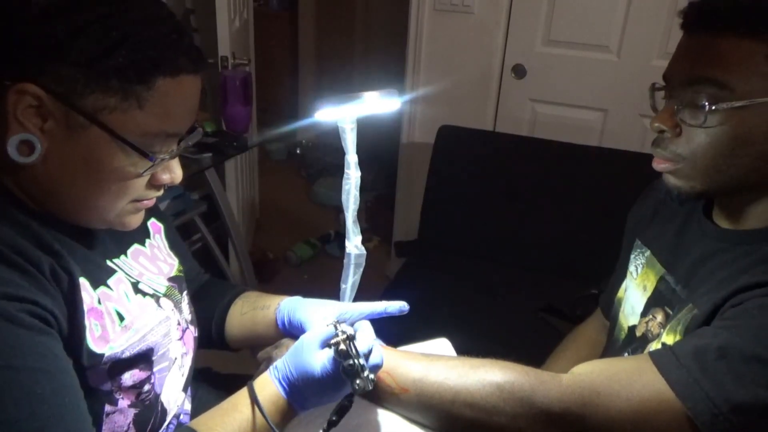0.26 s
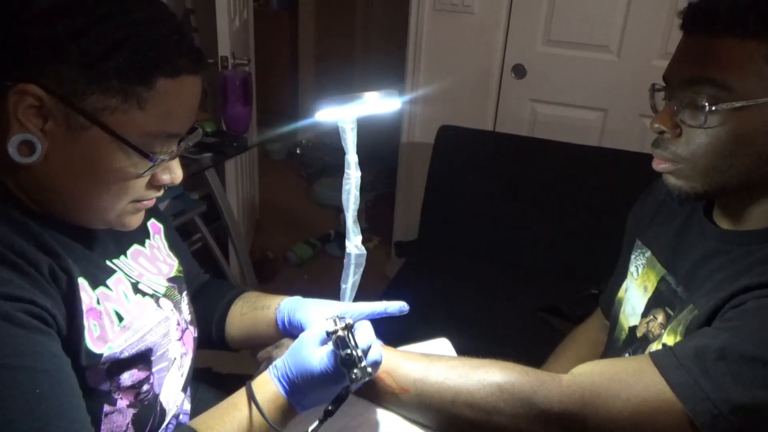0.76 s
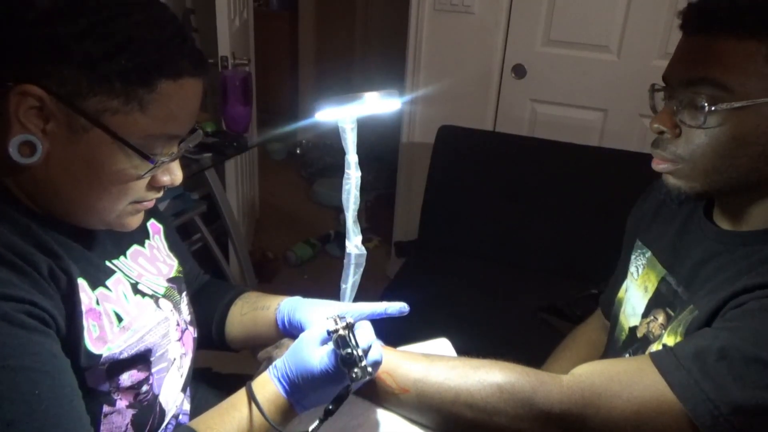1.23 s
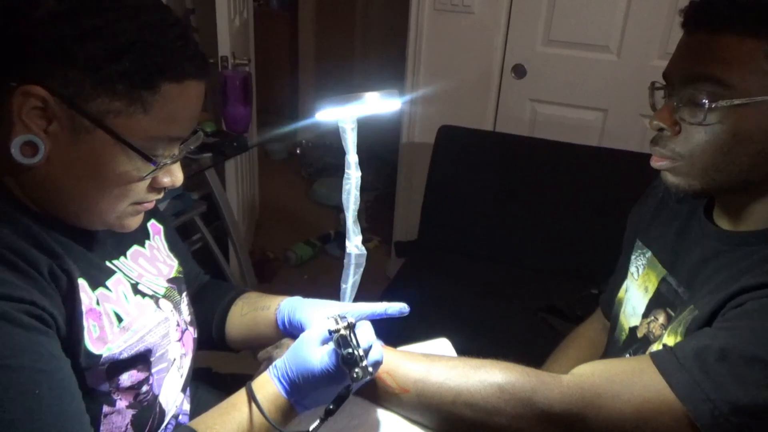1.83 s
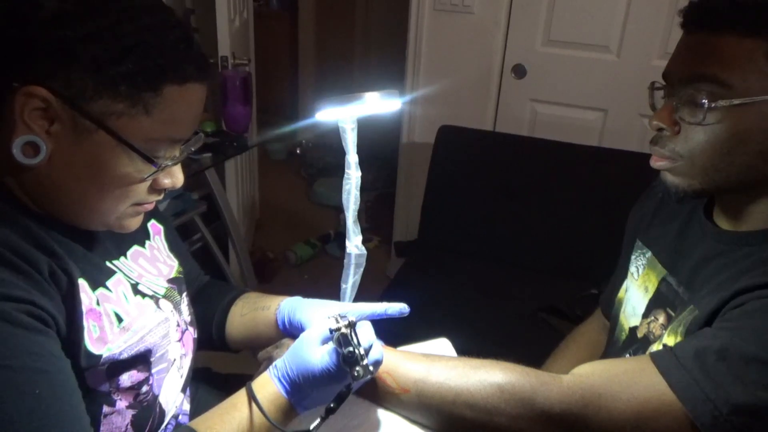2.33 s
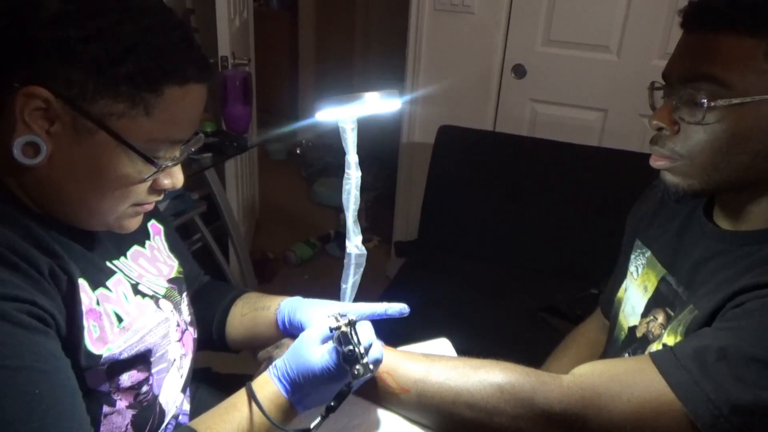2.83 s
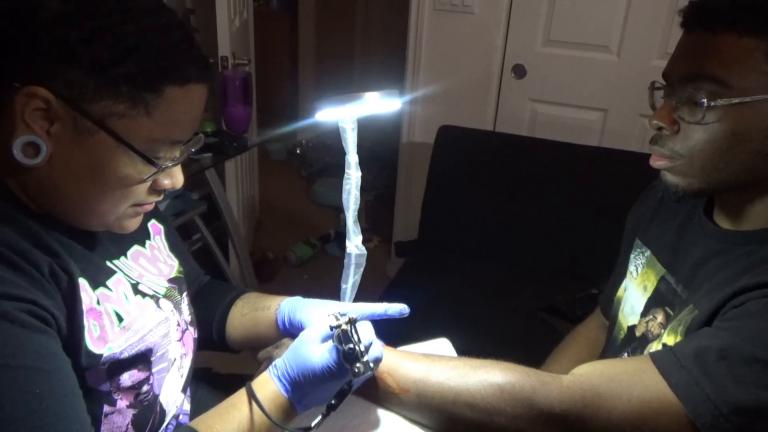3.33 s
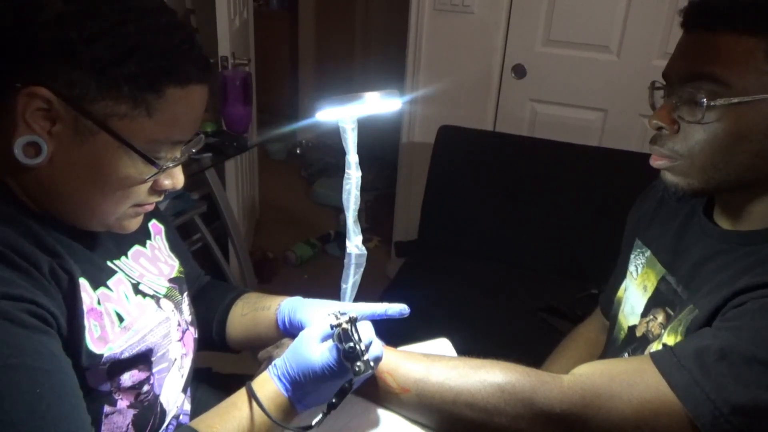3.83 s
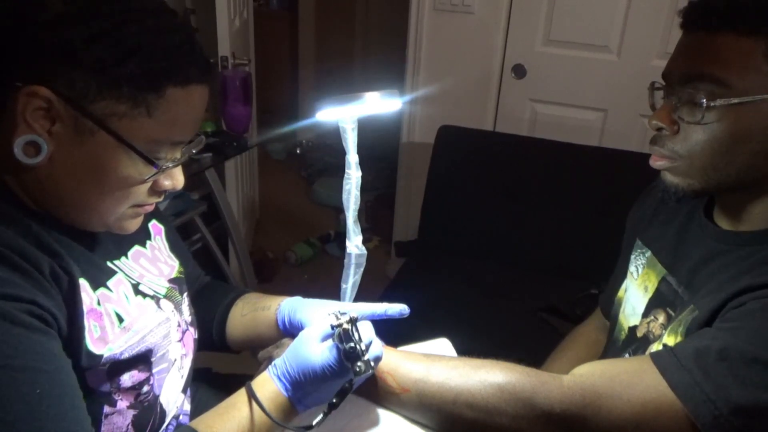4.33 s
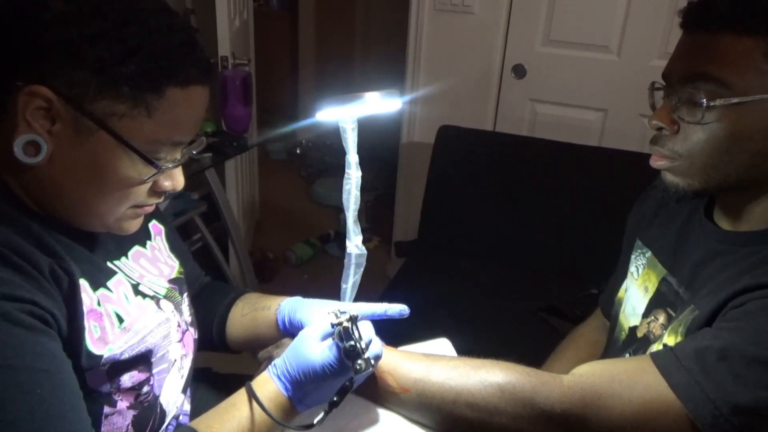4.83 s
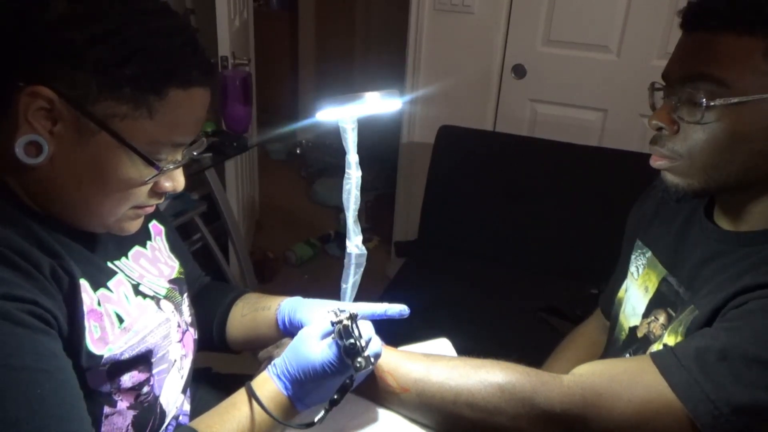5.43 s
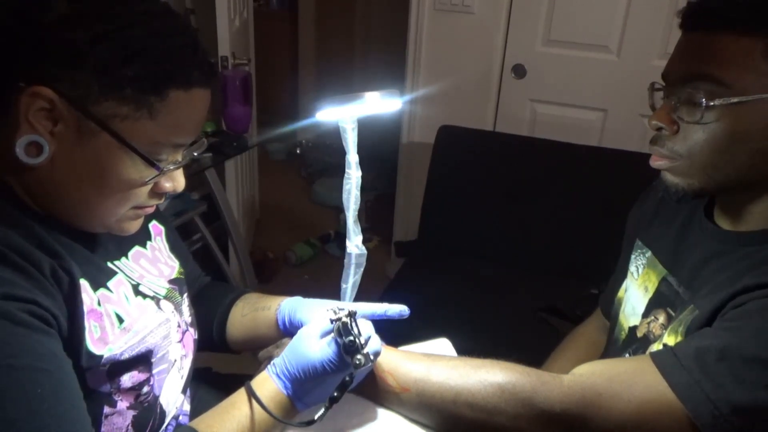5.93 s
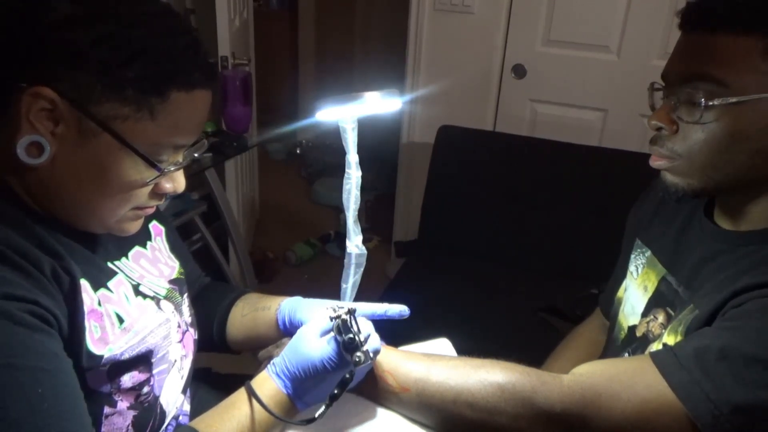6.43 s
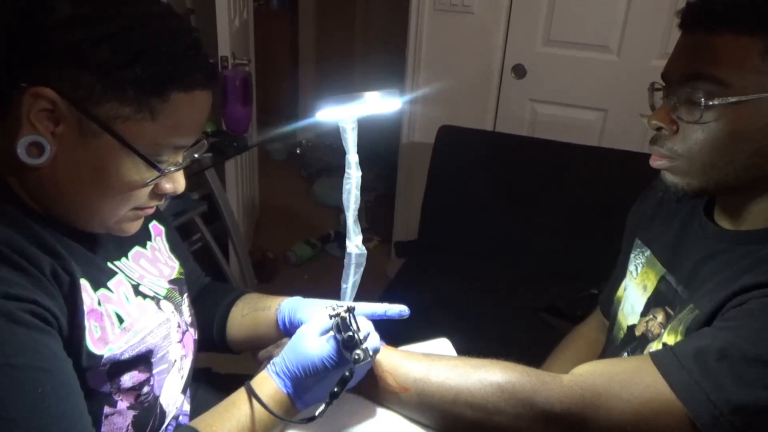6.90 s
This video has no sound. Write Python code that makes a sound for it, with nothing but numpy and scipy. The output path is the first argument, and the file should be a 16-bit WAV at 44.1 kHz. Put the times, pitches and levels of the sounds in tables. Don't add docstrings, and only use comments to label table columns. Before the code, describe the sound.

A tattoo machine buzzes steadily and brightly up close in a small room, with one brief wooden seat creak early on.

```python
import sys
import numpy as np
from scipy import signal
from scipy.fft import rfft, irfft, next_fast_len
from scipy.io import wavfile

SR = 44100
rng = np.random.default_rng(int(sys.argv[2]) if len(sys.argv) > 2 else 0)


def wav_record(signal):
    frames = np.transpose(np.atleast_2d(signal))
    bounded = np.clip(frames, -1, 1)
    quanta = np.round(bounded * 32767).astype(np.int16)
    wavfile.write(sys.argv[1], SR, quanta)


def gain_from_db(level_db):
    decades = np.asarray(level_db, float) / 20
    return 10 ** decades


N = 315756

# time in seconds, strokes per second.
ARMATURE_SPEED = [(0.0, 108.8), (1.89, 107.9), (2.27, 108.2), (2.33, 110.3), (2.39, 110.4), (2.47, 107.7),
                  (2.77, 107.9), (2.85, 110.5), (3.07, 109.6), (3.13, 110.1), (4.91, 109.4), (5.42, 110.2),
                  (5.76, 109.9), (5.84, 108.7), (6.22, 109.1), (6.66, 108.1), (6.82, 110.3), (7.16, 110.2)]
# time in seconds, buzz level in dB, turn from 0 to 1.
HAND_TURN = [
    (0, -25, 0.27),
    (.4, -25.5, 0.3),
    (2.0, -25.5, .1),
    (3.3, -25, 0.08),
    (4.8, -25, 0.53),
    (5.9, -25, 0.64),
    (7.16, -24.5, 1),
]
# pitch in Hz, level in dB, time to fade by 60 dB in seconds.
FRAME_MODES = [(1000, -32, 0.0068), (1240, -25.5, 0.0033), (1916, -22.5, 0.019), (2103, -19.5, 0.0064),
               (2654, -23, 0.02), (3189, -15.5, 0.012), (3668, -12, 0.0048), (4220, -6.5, 0.0099),
               (4818, -17, 0.017), (5330, -10.5, 0.0082), (5744, -14.5, 0.0095), (7100, -6.5, 0.0055),
               (7715, 0.5, 0.0071), (8246, -6, 0.017), (8915, -5, 0.016), (9034, 0.5, 0.0043),
               (10490, 4.5, 0.0058), (10910, 2, 0.0063)]
# delay in ms, level in dB above 6 kHz,
# level in dB from 2 to 6 kHz, level in dB below 2 kHz.
SLAP_ECHOES = [(0, 8, 1.5, 6.5), (0.602, -19.5, 5, -2), (1.148, -6, 4, -21), (2.002, -41, -12, 1.5),
               (2.902, -7.5, -27, 3.5), (3.602, -9, -2.5, -15), (4.398, -10, -10.5, -8),
               (5.298, -6, -2.5, -6), (6.102, -52, -6, -22)]
# frequency in Hz, level in dB per Hz.
RATTLE_SPECTRUM = [(700, -46), (1200, -35), (1700, -28), (2800, -25), (3500, -19.5), (6500, -12.5),
                   (7500, -10), (9500, -6), (11000, -8), (14000, -50)]
# time in seconds, peak level in dB.
CREAK_SLIPS = [(1.412, -45), (1.424, -44), (1.444, -49), (1.556, -50), (1.577, -44), (1.672, -33),
               (1.681, -35), (1.690, -33.5), (1.7, -36.5), (1.709, -31), (1.725, -31.5), (1.748, -49),
               (1.765, -42.5), (1.781, -35), (1.793, -39), (1.820, -36.5), (1.831, -46)]
# frequency in Hz, level in dB per Hz.
HUM_SPECTRUM = [(15, -50), (25, -24.5), (162, -13.5), (305, -4.5), (356, 0), (928, 0), (977, 3.5),
                (1050, -7), (1330, 0), (1500, -22.5), (1950, -39), (3300, -120)]
# frequency in Hz, likeness from 0 to 1.
SIDE_LIKENESS = [(30, 1), (150, .96), (500, .9), (1400, .75), (3000, .55), (8000, .55), (11000, .7)]
# frequency in Hz, level in dB per Hz.
SPLATTER_SPECTRUM = [(6560, -52), (11200, -4), (11400, -20.5), (11400, -16), (11500, -8), (12200, -32),
                     (15900, -66), (22000, -120)]
# frequency in Hz, left minus right level in dB.
SIDE_LEAN = [(900, -1.4), (2500, -1.0), (5000, .3), (9000, 1.1)]
# middle in seconds, half length in seconds, timing slack in samples.
NEEDLE_DRAGS = [
    (.6, .15, .4),
    (1.2, .28, .75),
    (2.03, .1, 1.1),
    (2.27, .12, .9),
    (2.44, .08, .6),
    (2.75, .12, 1.0),
    (4.35, .1, .2),
    (5.51, .1, .5),
    (5.87, .15, .4),
    (6.6, .22, 1.1),
]

FIRST_STROKE = .37
EVEN_SLACK = .17
TURN_TOP_DB, TURN_MIDDLE_DB, TURN_LOWER_DB = -10.5, 5, 1
RATTLE_DB, HUM_DB, SPLATTER_DB = -34, -55, -49.5
ROOM_T60_S, ROOM_DB, SEAT_ROOM_DB = .25, -12.5, -4
WOOD_HZ = 734
BUMP_S, BUMP_DB, BUMP_LENGTH_S = 1.66, -67, .2
CUTOFF_HZ = 11030


def columns_in_time(rows):
    s, *columns = np.transpose(rows)
    return [np.interp(np.arange(N) / SR, s, c) for c in columns]


def at_hz(points, hz):
    point_hz, value = np.transpose(points)
    return np.interp(np.log(hz + 1), np.log(point_hz), value)


def rms_one(x):
    return x / np.sqrt(np.mean(x ** 2) + 1e-20)


def highpass(x, order, hz):
    return signal.sosfilt(signal.butter(order, hz, "high", fs=SR, output="sos"), x)


def drift(rate, at):
    r = np.exp(-200 * np.pi * rate / SR)
    slow = signal.lfilter([1], [1, -2 * r, r * r], rng.standard_normal(N // 100 + 1002))
    slow = slow[1000:]
    return np.interp(at / 100, np.arange(len(slow)), rms_one(slow - slow.mean()))


def clicks(at, sizes):
    whole = np.floor(at).astype(int)[:, None] + np.arange(-7, 9)
    off = whole - at[:, None]
    shape = np.sinc(off) * np.cos(np.pi * off / 16) ** 2
    return np.bincount(np.clip(whole, 0, N).ravel(), (sizes[:, None] * shape).ravel(), N + 1)[:N]


def ring(x, hz, t60):
    r = gain_from_db(-60 / (t60 * SR))
    w = 2 * np.pi * hz / SR
    return signal.lfilter([0, np.sin(w)], [1, -2 * r * np.cos(w), r * r], x + 1e-18)


def sides(pan_db):
    return gain_from_db(np.array([[.5], [-.5]]) * pan_db)


def coloured_noise(spectrum):
    size = next_fast_len(N)
    hz = np.arange(size // 2 + 1) * SR / size
    alike = np.clip(at_hz(SIDE_LIKENESS, hz), 0, 1)
    mid, side = rfft(rng.standard_normal((2, size)))
    pair = np.sqrt(1 + alike) * mid + np.sqrt(1 - alike) * side * [[1], [-1]]
    return rms_one(irfft(pair * gain_from_db(at_hz(spectrum, hz)), size)[:, :N])


def stroke_count():
    return np.cumsum(columns_in_time(ARMATURE_SPEED)[0]) / SR - FIRST_STROKE


def slap_places():
    strokes = stroke_count()
    return np.interp(np.arange(int(strokes[-1]) + 1), strokes, np.arange(N))


def slack_at(at):
    slack = EVEN_SLACK
    for s, half, size in NEEDLE_DRAGS:
        slack = slack + size * np.clip(1 - ((at / SR - s) / half) ** 2, 0, 1)
    return slack


def slaps_and_echoes():
    at = slap_places()
    slack = slack_at(at)
    skips = rng.standard_normal(len(at)) * rng.exponential(1, len(at)) ** 1.5 / 2.5
    at = at + slack * skips
    force_db = (.3 + .4 * slack) * rng.standard_normal(len(at)) + .4 * drift(15.0, at)
    blows = 0
    for k, (delay_ms, *range_db) in enumerate(SLAP_ECHOES):
        pan_db = .6 * delay_ms * (-1) ** k
        late = at + delay_ms * (1 + .004 * drift(.3, at)) * SR / 1000
        echo_db = force_db + (delay_ms > 0) * .8 * drift(1.2, at)
        train = clicks(late, gain_from_db(echo_db)) * sides(pan_db)
        blows = blows + gain_from_db(np.array(range_db))[:, None, None] * train
    return blows


def steel_frame(turn):
    blows = slaps_and_echoes()
    turned = turn - turn.mean()
    frame = 0
    for k, (hz, mode_db, t60) in enumerate(FRAME_MODES):
        turn_db = (TURN_TOP_DB * (8400 < hz < 9700) + TURN_MIDDLE_DB * (6200 < hz < 7400)
                   + TURN_LOWER_DB * (hz < 6200))
        facing_db = turn_db * turned + .7 * drift(.8, np.arange(N))
        pitch_range = int(hz < 6000) + int(hz < 2000)
        struck = blows[pitch_range] * gain_from_db(facing_db)
        sign = (-1) ** min(k, len(FRAME_MODES) - 2)
        frame = frame + sign * ring(struck, hz, t60) * gain_from_db(mode_db) * sides(at_hz(SIDE_LEAN, hz))
    return highpass(frame, 4, 850)


def loose_rattle():
    since_slap = (stroke_count() % 1) / 109.
    shake = 0.68 + np.exp(-since_slap / 0.0013)
    return gain_from_db(RATTLE_DB) * rms_one(shake * coloured_noise(RATTLE_SPECTRUM))


def machine():
    buzz_db, turn = columns_in_time(HAND_TURN)
    frame = rms_one(steel_frame(turn)) * gain_from_db(buzz_db - 0.5)
    return frame + loose_rattle() * gain_from_db(buzz_db - buzz_db.mean())


def hum():
    return gain_from_db(HUM_DB) * coloured_noise(HUM_SPECTRUM)


def room(x):
    t = np.arange(round(.4 * SR)) / SR
    tail = rng.standard_normal((2, len(t))) * gain_from_db(-60 * t / ROOM_T60_S) * (t > .004)
    tail = signal.lfilter([1], [1, -.65], tail)
    tail = highpass(tail, 2, 500)
    tail = tail / np.sqrt(np.sum(tail ** 2, 1, keepdims=True))
    return signal.fftconvolve(x, tail, axes=1)[:, :N]


def splatter():
    at = slap_places() + 8.9
    bursts = []
    for side in range(2):
        burst_db = 12.0 * np.clip(rng.standard_normal(len(at)), -3, 2)
        bursts.append(clicks(at, gain_from_db(burst_db)))
    gate = signal.fftconvolve(np.array(bursts), np.hanning(90)[None], "same", axes=1) + 0.073
    noise = coloured_noise(SPLATTER_SPECTRUM)[0]
    swell = gain_from_db(np.linspace(-6, 3, N) + 2.0 * drift(6.0, np.arange(N)))
    splash = rms_one(swell * gate * [noise, noise[::-1]])
    return gain_from_db(SPLATTER_DB) * highpass(splash, 4, 6000)


def seat():
    t, pushes, body = np.arange(N) / SR, np.zeros(N), np.zeros(N)
    for s, peak_db in CREAK_SLIPS:
        i = round(s * SR)
        wave = np.sin(2 * np.pi * WOOD_HZ * t[i:i + 480])
        pushes[i:i + 480] += gain_from_db(peak_db) * np.hanning(480) * wave / 45
        body[i:i + 60] += gain_from_db(peak_db) * np.hanning(60) / 30
    rung = ring(pushes, WOOD_HZ, .022) + gain_from_db(-11.5) * ring(body, 390.0, .03)
    age = np.clip((t - BUMP_S) / BUMP_LENGTH_S, 0, 1)
    rumble = rms_one(signal.lfilter([1], [1, -.97], rng.standard_normal(N)))
    bump = gain_from_db(BUMP_DB) * np.sin(np.pi * np.sqrt(age)) * rumble
    return rung * sides(-2) + bump


def scene():
    buzz, creak = machine(), seat()
    tail = gain_from_db(ROOM_DB) * room(buzz + gain_from_db(SEAT_ROOM_DB) * creak)
    return buzz + creak + tail + hum()


def roll_off(x):
    return signal.sosfilt(signal.butter(12, 14500, fs=SR, output="sos"), x)


def record(dry):
    wall = signal.firwin(numtaps=801, cutoff=CUTOFF_HZ, fs=SR, window=("kaiser", 7))
    mix = signal.fftconvolve(dry, wall[None], "same", axes=1) + splatter()
    return roll_off(mix)


dry = scene()
out = record(dry)
wav_record(out)
```